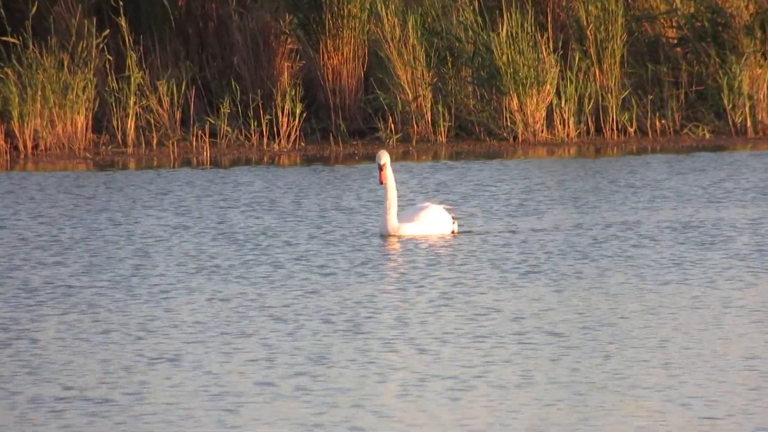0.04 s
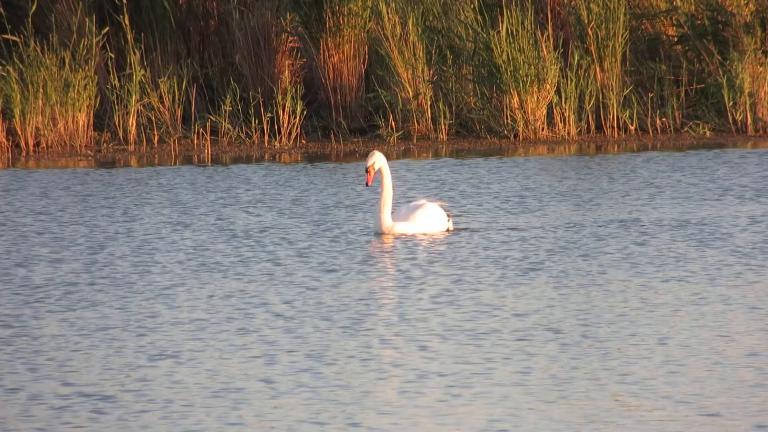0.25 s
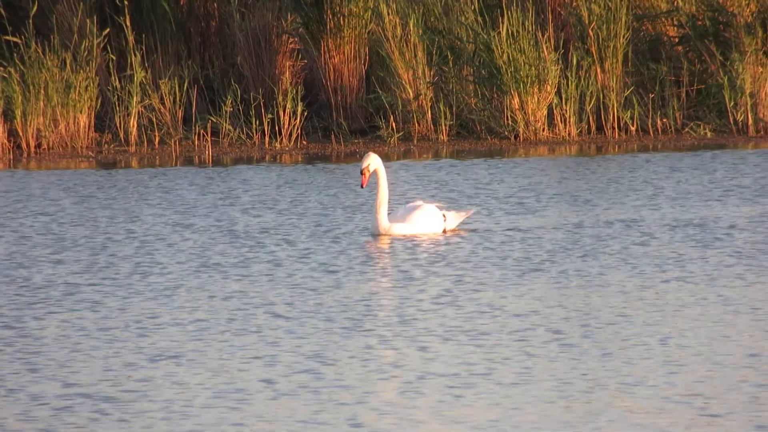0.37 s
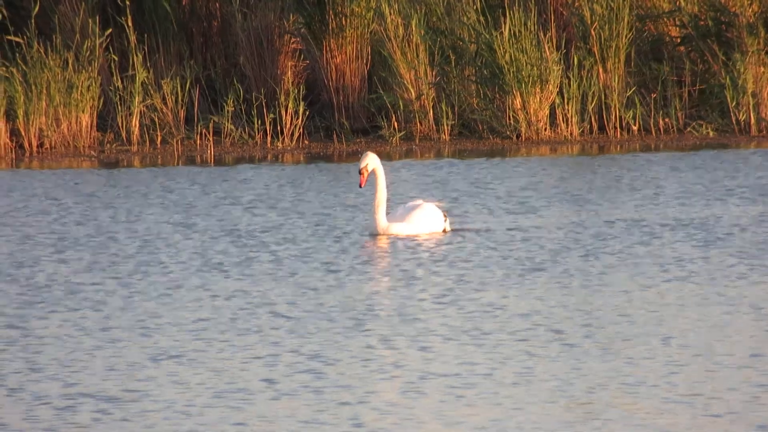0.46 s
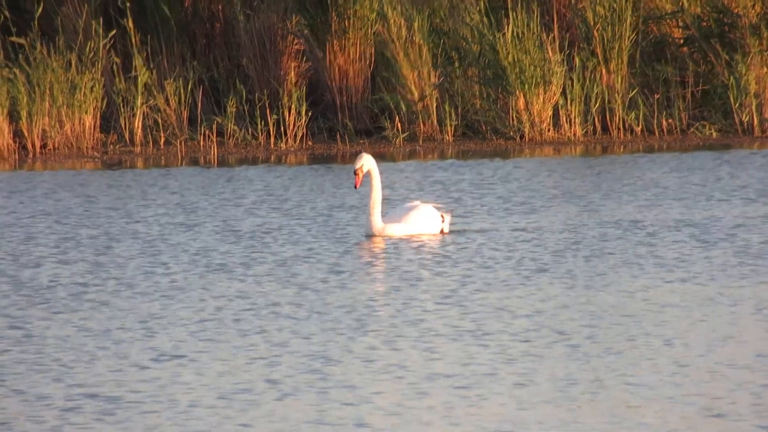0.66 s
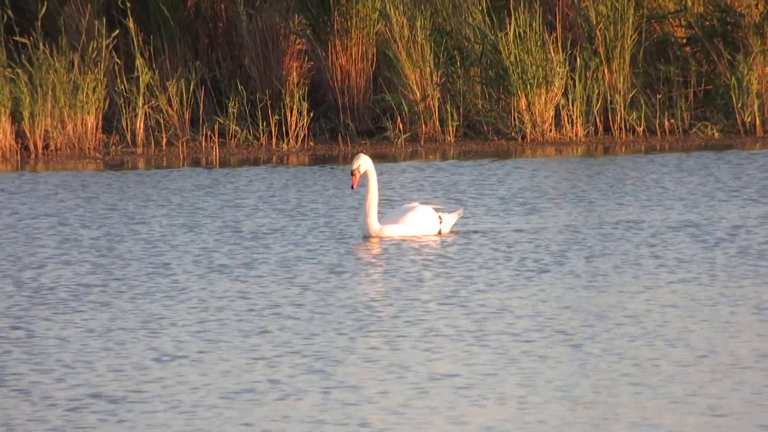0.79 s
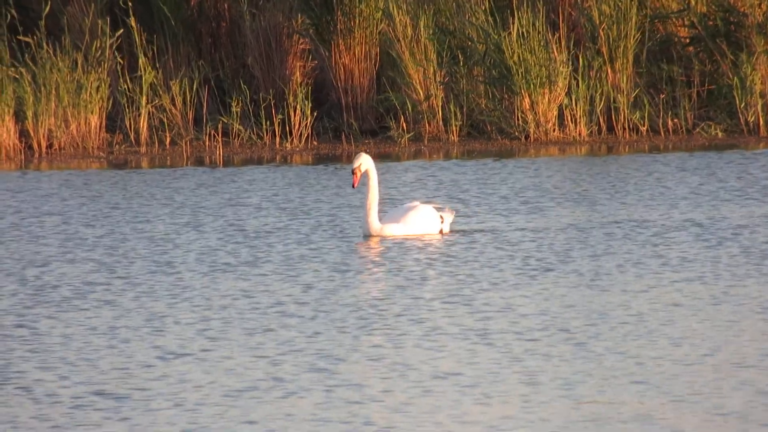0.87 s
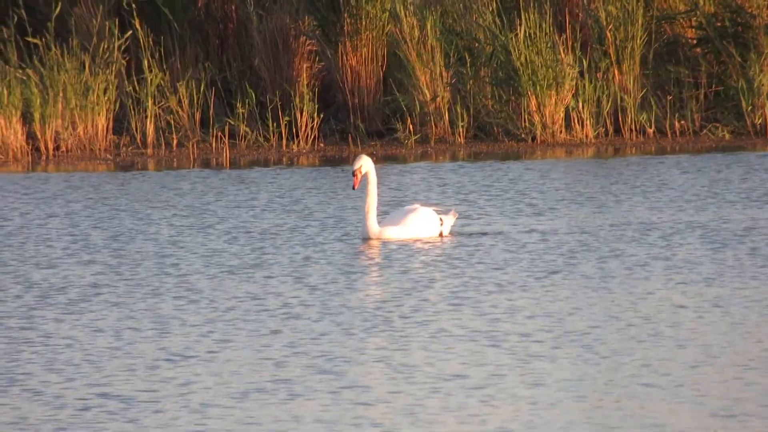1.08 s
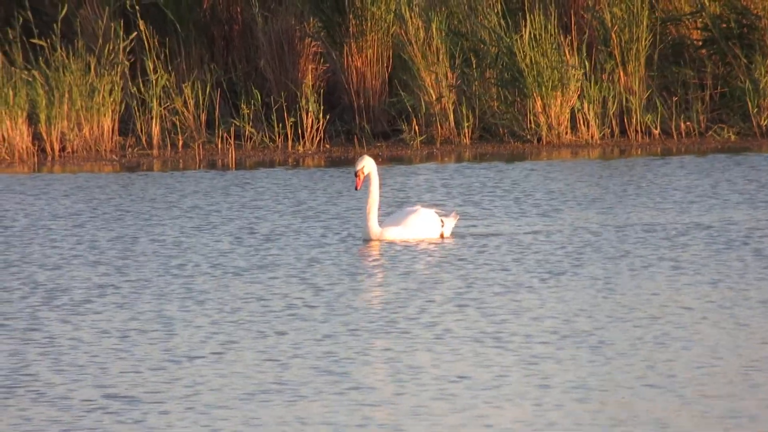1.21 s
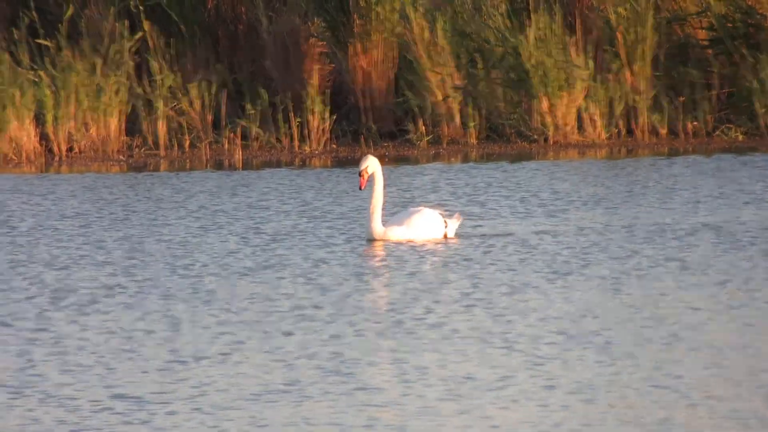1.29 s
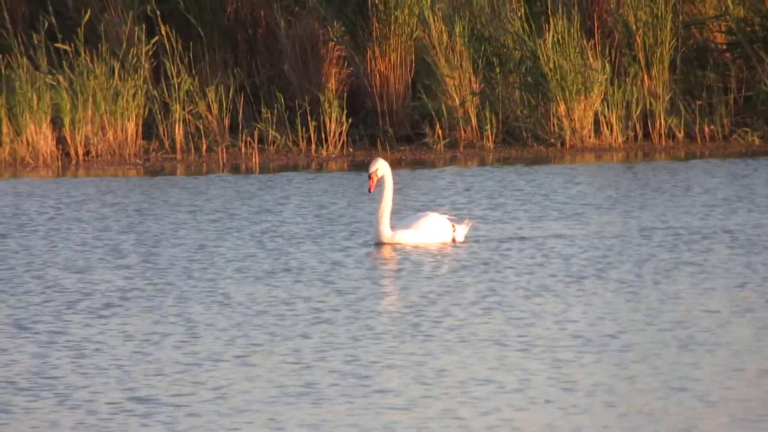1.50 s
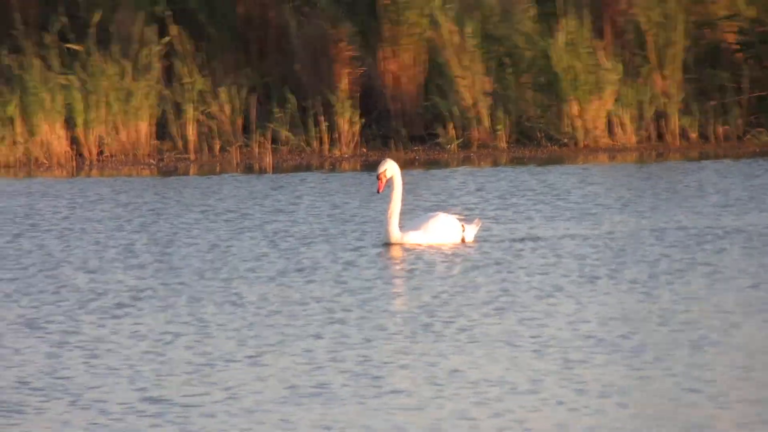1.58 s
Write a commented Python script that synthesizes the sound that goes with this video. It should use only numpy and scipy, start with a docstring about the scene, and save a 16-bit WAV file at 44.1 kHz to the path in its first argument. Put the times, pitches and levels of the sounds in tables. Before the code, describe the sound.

A swan honks with a rising whoop that cracks upward, then a short arched note, echoing lightly across a reedy pond. Small birds chirp faintly far off over soft hiss and light wind on the microphone.

```python
"""A swan honks across a reedy pond: a long rising whoop that cracks upward, then a short arched note.
Its voice is five clean partials riding one pitch curve, a little to the right, and the banks echo it.
Underneath, the air hisses, light wind bumps a mid-side camera microphone, and a thin whine throbs
at the top of hearing. Small birds chirp far off in short, raspy whistles."""
import sys
import numpy as np
from scipy import signal
from scipy.fft import rfft, irfft
from scipy.io import wavfile
from scipy.ndimage import uniform_filter1d

SR = 44100
rng = np.random.default_rng(int(sys.argv[2]) if len(sys.argv) > 2 else 0)


def master(y):
    """Save y as 16-bit WAV."""
    cut = np.clip(np.atleast_2d(y).T, -1, 1)
    pcm = np.round(cut * 32767)  # scale
    wavfile.write(sys.argv[1], SR, pcm.astype(np.int16))


N = 72765


def undb(db):
    """Gain of a level in dB."""
    return 10 ** (np.asarray(db) / 20)


def level(x, db):
    """Set a layer to an rms level."""
    return x * undb(db) / np.sqrt(np.mean(x ** 2))


def drift(rate_hz):
    """Smooth random modulator with a spread near 1."""
    hold = int(SR / rate_hz)
    steps = np.repeat(rng.standard_normal(N // hold + 1), hold)
    return 1.52 * uniform_filter1d(uniform_filter1d(steps, hold), hold)[:N]


PITCH_WOBBLE, SHIMMER_DB = 0.0034, 1.22
# the long whoop: t/s, f/Hz, fundamental level/dB, octave level/dB, third partial level/dB
WHOOP_NOTE = [(0.0, 407, -60, -87, -77), (0.018, 428.7, -63, -72, -74), (0.066, 445, -57.5, -58, -57.5),
              (0.116, 486, -56, -64, -80), (0.144, 495, -52.5, -54, -67), (0.226, 593.4, -43.5, -47.5, -69),
              (0.242, 621, -37, -47.5, -91), (0.244, 629, -40, -40.5, -73), (0.26, 642, -38.5, -42.5, -56),
              (0.28, 630, -42.5, -44, -62), (0.296, 602, -45, -54, -90), (0.3, 609, -43, -53, -94),
              (0.314, 610.6, -39.5, -57, -78), (0.324, 684, -32, -35, -55), (0.334, 726.7, -32, -37.5, -66),
              (0.35, 733, -30.5, -37, -48.5), (0.37, 743.4, -25, -42, -55), (0.392, 806, -25.5, -37, -54),
              (0.42, 842, -25, -39, -57.5), (0.434, 883, -23, -40, -46), (0.446, 828, -33.5, -38, -49),
              (0.454, 789.4, -30, -45.5, -77), (0.46, 725.4, -37.5, -62, -65), (0.464, 647, -39, -60, -79),
              (0.466, 627, -54, -55, -50), (0.472, 563.0, -81, -61, -49)]
# the short arched note: t/s, f/Hz, fundamental level/dB, octave level/dB, third partial level/dB
ARCHED_NOTE = [(.478, 448.7, -64, -88, -85), (0.493, 590.2, -45, -47.5, -80), (.499, 691, -38, -49.5, -57),
               (.506, 754.5, -26, -36, -58), (0.523, 801, -27.5, -44, -60), (.535, 768, -28, -40.5, -54.5),
               (.552, 713.6, -30, -38, -63.5), (.562, 640.4, -33.5, -59, -66), (.576, 545, -48.5, -50, -53),
               (.595, 420, -60.5, -80, -84)]
# throat colour on partials 4 and 5: f/Hz, level/dB relative to the fundamental
THROAT_EQ = [(2600, -50), (2900, -35), (3200, -48), (3520, -36), (3700, -44), (3950, -32), (4150, -50)]


def swan(t):
    """Two gliding honks, their top partials coloured by the throat; returns fundamental and overtones."""
    fundamental, overtones = np.zeros((2, N))
    for note in (WHOOP_NOTE, ARCHED_NOTE):
        times, *curves = np.array(note).T
        pitch, db, octave_db, third_db = (uniform_filter1d(np.interp(t, times, c), 180) for c in curves)
        phase = 2 * np.pi * np.cumsum(pitch * (1 + PITCH_WOBBLE * drift(60.24))) / SR
        attack = np.clip((t - times[0]) / 0.0018, 0, 1)
        release = np.clip((times[-1] - t) / 0.0054, 0, 1)
        gate = np.sqrt(2) * attack * release
        body = undb(db + SHIMMER_DB * drift(70.16))
        octave = undb(octave_db + SHIMMER_DB * drift(68.4)) * np.cos(2 * phase + np.pi / 5)
        third = undb(third_db) * np.sin(3 * phase)
        edge = sum(undb(np.interp(k * pitch, *np.array(THROAT_EQ).T)) * np.sin(k * phase) for k in (4, 5))
        fundamental -= gate * body * np.sin(phase)
        overtones += gate * (body * edge + third - octave)
    return fundamental, overtones


AIR_TOP_HZ, SWELL_DB, LOW_FLICKER_DB = 15200, .3, 1.2
# tone of the air ahead, with far waterfowl murmuring in bands near 800 and 1300 Hz: f/Hz, relative level/dB
AIR_AHEAD_EQ = [(59, -22), (100, -15.5), (200, -10.5), (410, -11.5), (520, -13), (800, -5.5), (1050, -7.5),
                (1300, -4.5), (1600, -10), (1900, -13), (2500, -10.5), (3500, -12), (5900, -17),
                (15000, -24)]
# tone of the air at the sides: f/Hz, relative level/dB
AIR_SIDES_EQ = [(59, -27), (100, -13.5), (184, -16.5), (222, -13), (274, -12.5), (304, -14), (1260, -13),
                (1370, -13.5), (15000, -38)]


def air(eq, db):
    """A bed of hiss in half-octave bands that swell together and flicker alone, the lows most."""
    hz = np.maximum(np.fft.rfftfreq(N, 1 / SR), 1)
    eq_hz, eq_db = np.array(eq).T
    colour = undb(np.interp(np.log(hz), np.log(eq_hz), eq_db)) * (hz < AIR_TOP_HZ)
    spectrum = rfft(rng.standard_normal(N)) * colour
    swell_db = SWELL_DB * drift(0.5)
    hiss = np.zeros(N)
    for k in range(-2, 17):
        band = np.clip(1 - abs(2 * np.log2(hz / 80) - k), 0, 1)
        flicker_db = LOW_FLICKER_DB * drift(12.55) / (1 + max(k, 0) / 6)
        hiss += irfft(spectrum * band, N) * undb(swell_db + flicker_db)
    return level(hiss, db)


RUMBLE_BAND_HZ, BUMP_DB = (35.9, 78.9), 2.5
# gusts on the microphone: t/s, mid level/dB, side level/dB relative to mid
WIND_GUSTS = [(0.0, -58, 11), (0.09, -58, 13), (0.132, -68, 8), (0.298, -66, 19), (0.32, -55.5, 15),
              (0.45, -70.5, 12), (0.472, -74, 6), (0.51, -71, 6), (0.574, -80, 13), (0.624, -73.5, 13),
              (0.762, -83, 17), (0.982, -72, 11), (1.112, -73, 14), (1.144, -64.5, 20), (1.204, -85, 22),
              (1.24, -59.5, 17), (1.272, -79, 18), (1.322, -55, 13), (1.368, -86, 13), (1.4, -59, 8),
              (1.488, -80, 6), (1.524, -68, 10), (1.594, -85, 16), (1.65, -71, 20)]


def wind(t):
    """Wind buffets the capsules into a low, lumpy rumble, heavier on the side one; returns mid and side."""
    times, mid_db, side_db = np.array(WIND_GUSTS).T
    lows = signal.butter(2, RUMBLE_BAND_HZ, "bandpass", fs=SR, output="sos")
    buffets = [rng.standard_normal(N) * undb(BUMP_DB * drift(25)) for _ in range(2)]
    mid, side = (level(signal.sosfilt(lows, buffet), 0) for buffet in buffets)
    side *= undb(np.interp(t, times, side_db))
    return undb(np.interp(t, times, mid_db)) * np.array([mid, side])


WHINE_HZ, THROB_HZ, THROB_PEAK_S, THROB_DEPTH = 15733.7, 14.2, .118, .8


def high_whine(t):
    """A thin, throbbing whine at the top of hearing, with a fainter steady tone an octave down."""
    throb = 1 - THROB_DEPTH + THROB_DEPTH * abs(np.cos(np.pi * THROB_HZ * (t - THROB_PEAK_S)))
    whine = level(throb * np.sin(2 * np.pi * WHINE_HZ * t), db=-66)
    return whine + level(np.sin(np.pi * WHINE_HZ * t), db=-80)


NEAR_T60_S, FAR_T60_S, ECHO_BLOOM_S = .5, 2.35, .04


def bank_echo(call, t):
    """Near reeds scatter a short tail, far banks a long, quieter one; returns mid and side."""
    near = np.exp(-np.log(1000) * t / NEAR_T60_S)
    far = undb(-10) * np.exp(-np.log(1000) * t / FAR_T60_S)
    envelope = (near + far) * np.clip(t / ECHO_BLOOM_S, 0, 1) ** 2
    tails = rng.standard_normal((2, N)) * envelope / np.sqrt(np.sum(near ** 2))
    return signal.fftconvolve(call[None], tails, axes=1)[:, :N] * undb([[-21], [-25]])


RASP_HZ = 600
# far chirps: onset t/s, length/s, start f/Hz, bend f/Hz, end f/Hz, bend point/share of length, level/dB
BIRD_CHIRPS = [(.06, .06, 2300, 2750, 3600, .45, -59), (.83, .026, 2650, 3350, 4300, .5, -55.5),
               (.853, .05, 3800, 3150, 2800, .45, -57.5), (.848, .052, 4500, 3700, 3500, .35, -61),
               (.852, .03, 1500, 1250, 1600, .5, -56.5), (1.275, .04, 2600, 3850, 3500, .4, -67.5)]


def far_birds(t):
    """Short bent whistles, roughened by a fast flutter in level and phase."""
    chirps = np.zeros(N)
    for onset, length, start_hz, bend_hz, end_hz, bend_at, db in BIRD_CHIRPS:
        progress = (t - onset) / length
        pitch = np.interp(progress, [0, bend_at, 1], [start_hz, bend_hz, end_hz])
        phase = 2 * np.pi * np.cumsum(pitch) / SR
        fade = np.clip(np.minimum(progress, 1 - progress) * 6, 0, 1)
        whistle = (1 + .5 * drift(RASP_HZ)) * np.sin(phase) + .5 * drift(RASP_HZ) * np.cos(phase)
        chirps += undb(db) * fade * whistle
    return chirps


def scene():
    """Mix the pond in mid and side, then decode to left and right."""
    t = np.arange(N) / SR
    fundamental, overtones = swan(t)
    call = fundamental + overtones
    mid, side = bank_echo(call, t) + wind(t)
    mid += call + far_birds(t) + air(AIR_AHEAD_EQ, db=-57.5) + high_whine(t)
    side += air(AIR_SIDES_EQ, db=-46.5)
    side -= undb(-11.5) * fundamental + undb(-7) * overtones  # pans the swan right, overtones furthest
    return np.array([mid + side, mid - side])


def record(dry):
    """The camera's steep high cut at 16.3 kHz."""
    return signal.sosfilt(signal.ellip(10, .2, 70, 16300, fs=SR, output="sos"), dry)


dry = scene()
out = record(dry)
master(out)
```